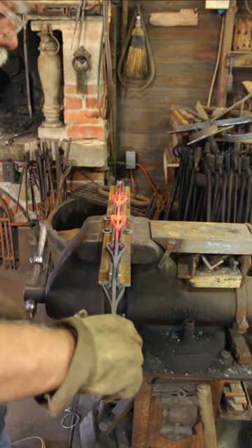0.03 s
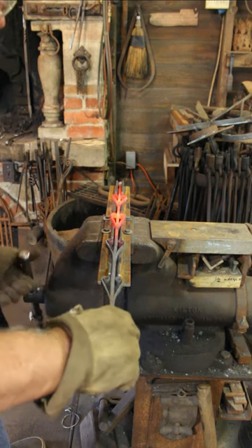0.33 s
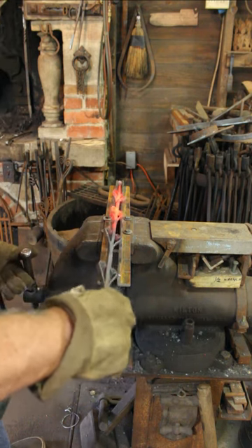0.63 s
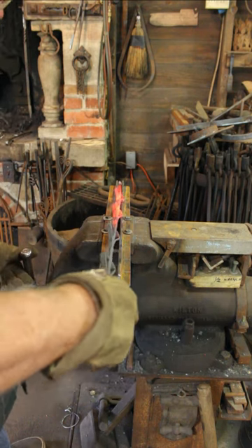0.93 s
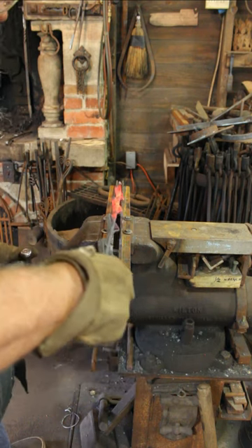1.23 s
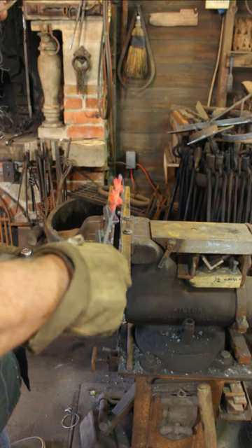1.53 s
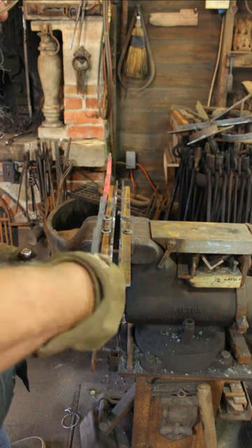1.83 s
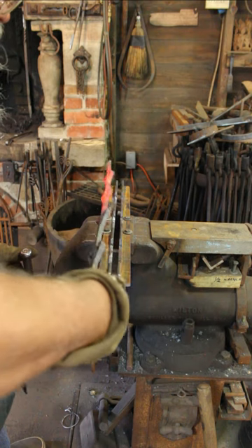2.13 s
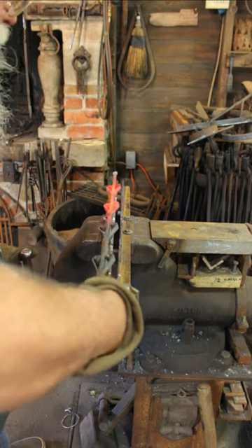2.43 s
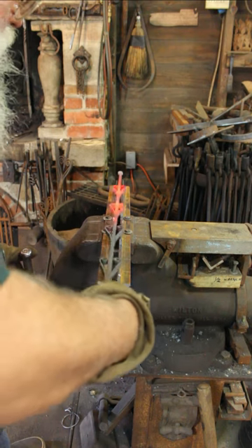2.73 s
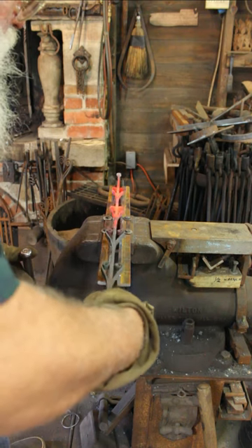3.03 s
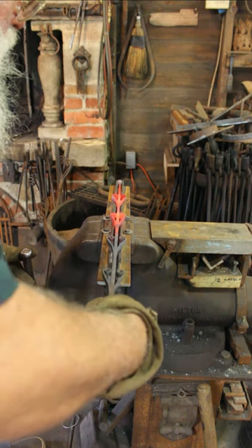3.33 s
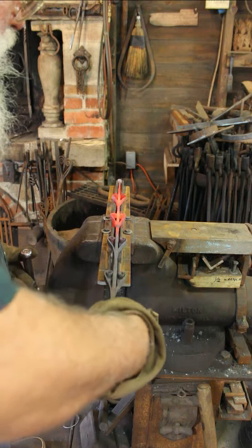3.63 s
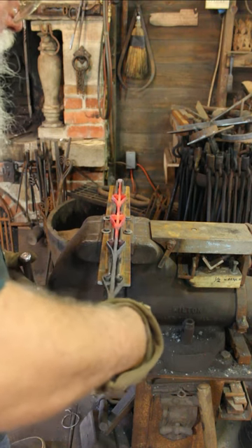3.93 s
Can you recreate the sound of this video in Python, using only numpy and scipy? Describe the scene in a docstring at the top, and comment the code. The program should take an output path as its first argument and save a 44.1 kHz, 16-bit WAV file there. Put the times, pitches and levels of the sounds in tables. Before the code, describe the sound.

A forge burner roars throughout in a workshop, low and throbbing over a hiss of air. Close to the microphone, a steel vice and tongs give a few light clinks early on and again in the second half.

```python
"""A blacksmith's workshop, one microphone close to the vice, a forge burner roaring behind it.
The burner fills the room: its flame booms in the low resonances of the chamber and rushes in
uneven surges over the hiss of the air feed. Close by, the steel vice is worked and a hot iron
piece is turned in its jaws with tongs, giving a few light clinks and a soft scrape."""
import sys
import numpy as np
from scipy import signal
from scipy.io import wavfile
from scipy.ndimage import uniform_filter1d

SR = 44100
rng = np.random.default_rng(int(sys.argv[2]) if len(sys.argv) > 2 else 0)


def bounce(signal):
    """Save signal as a 16-bit WAV file at the path given by the first command-line argument."""
    frames = np.transpose(np.atleast_2d(signal))
    limited = np.clip(frames, -1, 1)
    pcm = np.round(limited * 32767).astype(np.int16)
    wavfile.write(sys.argv[1], SR, pcm)


N = 176400

# Ringing of the vice handle, the jaws and the iron piece.
# Each row: frequency in Hz, relative level in dB, time to fall 60 dB (t60) in seconds.
HANDLE_MODES = [(4015, -17, .17), (5964, -3, .035), (6136, -3, .045), (6202, -11, .22), (7035, -9, .15),
                (8624, -13, .12), (8839, -19, .12), (11423, -8, .02), (11600, -4, .025), (11660, -20, .15),
                (13987, -6, .088), (14558, -13, .085)]
JAW_MODES = [(2150, 3, 0.06), (2734, 7.5, 0.05), (2960, -3, 0.086), (3046, -5.5, .1), (3360, -10, 0.083),
             (3630, -12, .09), (4390, -8, .08), (5580, -16.5, .15), (5640, -13.5, .2), (6298, -22, .1),
             (7700, -21, .08), (11100, -24, .06)]
IRON_MODES = [(1453, 2, .11), (1857, 3, .1), (2126, 4, .07), (2686, 2, .07), (3070, 1, .1), (3940, -5, .14),
              (4575, -6, .13), (5221, -4, .11), (5749, -11.5, .32), (6018, -12, .08), (6664, -12, .07),
              (7407, -13, .07), (7635, -11, .13), (8350, -16, .06)]
# The handle drops to its stop, the jaws are knocked, the iron settles in them.
# Each row: start in seconds, level in dB.
HANDLE_DROPS = [(.3243, -32.5)]
JAW_KNOCKS = [(.528, -47), (2.588, -40), (2.5922, -34.5), (3.374, -38), (3.384, -41)]
IRON_KNOCKS = [(2.8465, -40.5), (2.8503, -41.5)]
# Light touches of the tongs and the handle. Each row: start in seconds, level in dB, pitch in Hz, t60 in
# seconds.
TOUCH_PINGS = [(.424, -56, 5598, .35), (.634, -42, 4369, .22), (.696, -45, 4369, .2),
               (1.559, -45, 4457, .13), (2.592, -45, 4369, .16)]
# Crack of a contact. Each gives: relative level in dB, low and high edge in Hz, t60 in seconds.
HANDLE_CRACK, TOUCH_CRACK = (-4, 3000, 12000, .016), (-16, 4000, 11000, .05)
JAW_CRACK, IRON_CRACK = (0, 2300, 4400, .06), (1.5, 1500, 5200, .065)
# The iron slides on the jaws. Each row: start and length in seconds, level in dB, centre in Hz.
IRON_SLIDES = [(.62, .2, -61.5, 11000), (1.93, .2, -62.5, 8500), (2.486, .13, -56, 4240),
               (2.93, .08, -61.5, 8300)]

# Spectra of the air feed and the flame. Each row: frequency in Hz, relative density in dB.
HISS_SPECTRUM = [(100, 7), (1000, 4.5), (3000, -12), (5500, -18.5), (8000, -32), (15500, -33.5)]
RUSH_SPECTRUM = [(25, -5), (55, -2), (100, -2.5), (200, 7.5), (300, 13.5), (430, 6.5), (580, 1.5),
                 (700, -0.5), (1150, -3), (1550, -5), (1900, -10), (2500, -12.5), (3100, -14),
                 (3700, -20.5), (5300, -28), (7000, -33), (10000, -38.5), (15500, -38.5)]
# Strength of the flame's rush. Each row: time in seconds, level in dB.
FLAME_LEVEL = [(0.0, -35), (0.27, -30.5), (0.3, -28.5), (0.43, -36.5), (0.47, -36.5), (0.53, -32.5),
               (0.61, -33), (0.72, -28.5), (0.88, -35.0), (1.09, -31), (1.21, -31.5), (1.27, -29),
               (1.31, -32.5), (1.39, -28), (1.47, -35), (1.61, -32.0), (1.67, -34.5), (1.75, -29.5),
               (1.8, -33.5), (1.87, -29.5), (1.93, -32.5), (2.06, -29.5), (2.09, -33.5), (2.27, -26.5),
               (2.409, -33.5), (2.47, -31), (2.52, -28.5), (2.6, -27.5), (2.651, -33), (2.76, -30),
               (2.82, -35.5), (2.94, -31.5), (3.07, -35.5), (3.16, -29), (3.34, -33.5), (3.39, -29),
               (3.46, -33), (3.59, -30), (3.71, -35), (3.82, -30), (3.91, -35), (3.99, -31)]
# How far the rush follows the flame. Each row: frequency in Hz, share of the swing in level.
SURGE_SHARE = [(60, 0.26), (400, 1.0), (1500, 1.0), (4500, .85), (12000, 0.75)]
# Resonances of the fire chamber: the higher ones of its mouth, the weak low ones, the two strong ones.
# Each row: frequency in Hz, width in Hz, relative level in dB.
MOUTH_MODES = [(380.5, 18, -11), (402.1, 15, -13), (424.8, 16, -6), (504.2, 24, -10.5), (537, 8.3, -16),
               (573, 32, -11), (706, 20, -17.5), (769, 16, -15.5), (889.6, 13, -16.5), (1053, 32, -16.5),
               (1104, 22, -19.5), (1149, 60, -14.5), (1208, 92, -16.5), (1438, 8.8, -16.5), (1552, 97, -15),
               (2082, 40, -23), (2280, 130, -18.5), (2644, 290, -20.5), (3026, 120, -29.5)]
RUMBLE_MODES = [(62, 10, -54), (87.6, 9.1, -39), (122.5, 11, -31.5), (143.4, 16, -30), (219.7, 21, -25.5),
                (232.5, 14, -29), (252.8, 16, -30), (275.3, 6.9, -36.5), (295.2, 14, -36)]
BOOM_MODES = [(166.4, 9.8, -19), (191.55, 13.6, -15.5)]
# Throb of the boom, taken about its mean. Each row: time in seconds, relative level in dB.
BOOM_THROB = [(0.0, -20), (0.13, -11.5), (0.15, -17), (0.41, -12), (0.44, -15.5), (0.86, -10.5),
              (0.88, -25), (0.9, -6.5), (0.97, -24), (0.99, -15.5), (1.31, -11.5), (1.37, -22), (1.4, -7.5),
              (1.49, -21), (1.64, -7.5), (1.67, -16.5), (1.78, -14), (1.82, -26.5), (1.88, -4.5),
              (1.9, -17.5), (2.27, -14), (2.33, -10), (2.35, -16), (2.38, -11), (2.51, -24.5), (2.63, -9),
              (2.65, -15), (2.77, -8.5), (2.81, -15.5), (3.0, -10), (3.03, -18), (3.29, -12), (3.32, -26.5),
              (3.43, -8.5), (3.5, -19), (3.63, -9.5), (3.8, -15), (3.88, -10.5), (3.93, -19.5), (4.0, -17)]
# Brief swells of the boom. Each row: time of the peak in seconds, extra level in dB.
BOOM_SWELLS = [(0.313, 3.5), (.36, 7.5), (0.402, 4), (0.791, 3), (1.447, 5), (1.765, 2.5), (2.069, 9),
               (2.322, 5.5), (2.622, 5), (2.85, 6), (2.988, 4), (3.281, 7), (3.425, 2.5), (3.871, 2.5)]


def from_db(db):
    """Decibels to gain."""
    return 10 ** (np.asarray(db) / 20)


def unit_rms(x):
    """Scale to rms 1."""
    return x / np.sqrt(np.mean(x ** 2) + 1e-20)


def at_hz(table, hz):
    """Read a table on a log-frequency axis."""
    frequencies, values = np.transpose(table)
    return np.interp(np.log(hz), np.log(frequencies), values)


def drift(rate_hz, step=40):
    """Random wander with a spread of 1, mostly slower than rate_hz."""
    pole = np.exp(-2 * np.pi * rate_hz * step / SR)
    white = rng.standard_normal(N // step + 2002)
    slow = signal.lfilter([1], [1, -2 * pole, pole * pole], white)[2000:]
    return np.interp(np.arange(N) / step, np.arange(len(slow)), unit_rms(slow))


def band(x, low_hz, high_hz):
    """Band-pass."""
    sections = signal.butter(2, [low_hz, min(high_hz, SR / 2 - 1)], "band", fs=SR, output="sos")
    return signal.sosfilt(sections, x)


def resonant_noise(hz, width_hz):
    """Noise passed twice through one resonance, at rms 1."""
    r = np.exp(-np.pi * width_hz / SR)
    section = [1 - r, 0, r - 1, 1, -2 * r * np.cos(2 * np.pi * hz / SR), r * r]
    return unit_rms(signal.sosfilt([section, section], rng.standard_normal(N + SR // 2))[-N:])


def noise_bands(spectrum):
    """Centres in Hz and third-octave bands of noise that add up to rms 1."""
    edges = 20 * 2 ** (np.arange(31) / 3)
    centres = np.sqrt(edges[1:] * edges[:-1])
    white = rng.standard_normal((2, N + SR // 2))
    bands = np.array([from_db(at_hz(spectrum, hz)) * band(white[k % 2], edges[k], edges[k + 1])[-N:]
                      for k, hz in enumerate(centres)])
    return centres, bands / bands.sum(0).std()


def workshop(x, t60_s=.35, level_db=-8):
    """Dense short reflections of a cluttered wooden room reach the microphone after the direct sound."""
    t = np.arange(SR // 2) / SR
    tail = band(rng.standard_normal(len(t)), 300, 8000) * from_db(-60 * t / t60_s) * (t > .005)
    return from_db(level_db) * signal.fftconvolve(x, tail / np.linalg.norm(tail))[:len(x)]


def scrapes():
    """Faint, close to the microphone: grainy friction swells and fades with each slide of the iron."""
    t = np.arange(N) / SR
    out = np.zeros(N)
    for start, length, db, hz in IRON_SLIDES:
        arch = np.sin(np.pi * np.clip((t - start) / length, 0, 1))
        grain_db = drift(rate_hz=150)
        out += arch * from_db(db + grain_db) * resonant_noise(hz, width_hz=3000)
    return out


def clinks(hits, modes, contact, attack_s=.0001):
    """Metal on metal, close up: each hit rings the modes unevenly and sends a crack round the room."""
    out, t = np.zeros(N + SR), np.arange(SR // 2) / SR
    crack_db, low_hz, high_hz, crack_t60 = contact
    attack = np.minimum(t / attack_s, 1)
    for start, db in hits:
        ring = np.zeros(len(t))
        for hz, mode_db, t60 in modes:
            decay = from_db(mode_db + rng.normal(0, 1) - 60 * t / t60)
            ring += decay * np.sin(2 * np.pi * (hz * t + rng.random()))
        noise = unit_rms(band(rng.standard_normal(len(t)), low_hz, high_hz))
        crack = noise * from_db(crack_db - 60 * t / crack_t60)
        i = int(start * SR)
        out[i:i + len(t)] += from_db(db) * attack * (ring + crack + workshop(crack))
    return out[:N]


def light_touches():
    """Each light touch of the tongs or the handle rings a single partial."""
    return sum(clinks([(start, db)], [(hz, 0, t60)], TOUCH_CRACK) for start, db, hz, t60 in TOUCH_PINGS)


def air_hiss(level_db=-47.5):
    """Back at the forge, the air feed hisses steadily."""
    _, bands = noise_bands(HISS_SPECTRUM)
    return from_db(level_db) * bands.sum(0)


def rumble(swing_db, share=.2):
    """The chamber's weaker resonances rise and fall a little with the flame."""
    resonances = sum(from_db(db) * resonant_noise(hz, width) for hz, width, db in RUMBLE_MODES)
    return from_db(share * swing_db) * resonances


def rush(mean_db, swing_db, broad_db=3.5, flutter_db=.5, patchy_db=.46):
    """Broad flame noise and the mouth's resonances surge and flutter together."""
    surge_db = swing_db + flutter_db * drift(rate_hz=22)
    broad = np.zeros(N)
    for hz, noise in zip(*noise_bands(RUSH_SPECTRUM)):
        wander_db = patchy_db * drift(rate_hz=12)  # each band also wavers on its own
        broad += noise * from_db(broad_db + at_hz(SURGE_SHARE, hz) * surge_db + wander_db)
    mouth = sum(from_db(db) * resonant_noise(hz, width) for hz, width, db in MOUTH_MODES)
    return from_db(mean_db) * (broad + mouth * from_db(surge_db))


def boom(gain_db=-1.5, throb_share=.98, even_s=.058, swell_s=.012):
    """Turbulence drives two chamber resonances that beat; their joint power throbs and briefly swells."""
    t = np.arange(N) / SR
    pair = sum(from_db(db) * resonant_noise(hz, width) for hz, width, db in BOOM_MODES)
    power = uniform_filter1d(pair ** 2, int(even_s * SR)) / np.mean(pair ** 2)
    steady = pair / np.sqrt(power)  # evens out the slow wander, keeps the fast beating
    throb_db = np.interp(t, *np.transpose(BOOM_THROB))
    swell_db = sum(db * np.exp(-((t - peak) / swell_s) ** 2) for peak, db in BOOM_SWELLS)
    return steady * from_db(gain_db + throb_share * (throb_db - throb_db.mean()) + swell_db)


def scene():
    """From the vice, in mono: the loud burner behind, light sounds of steel in front."""
    flame_db = np.interp(np.arange(N) / SR, *np.transpose(FLAME_LEVEL))
    swing_db = flame_db - flame_db.mean()
    burner = boom() + rumble(swing_db) + rush(flame_db.mean(), swing_db) + air_hiss()
    handle = clinks(HANDLE_DROPS, HANDLE_MODES, HANDLE_CRACK)
    jaws = clinks(JAW_KNOCKS, JAW_MODES, JAW_CRACK)
    iron = clinks(IRON_KNOCKS, IRON_MODES, IRON_CRACK)
    return (burner + handle + jaws + iron + light_touches() + scrapes())[None]


def record(dry, cutoff_hz=15750):
    """The highest peaks are rounded and the top of the treble is cut."""
    rounded = dry / (1 + dry ** 8) ** (1 / 8)
    low_pass = signal.firwin(401, cutoff_hz, fs=SR, window=("kaiser", 9))
    return signal.fftconvolve(rounded, low_pass[None], "same", axes=1)


dry = scene()
out = record(dry)
bounce(out)
```